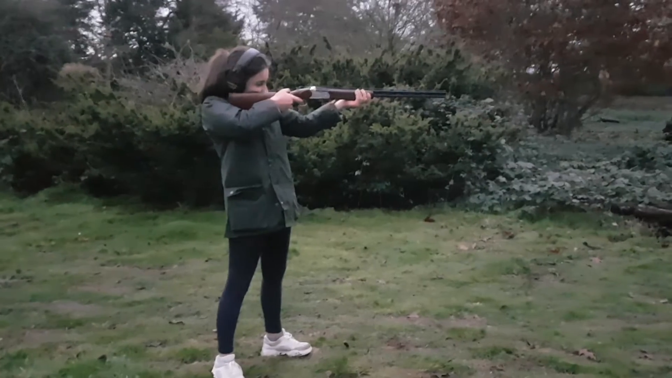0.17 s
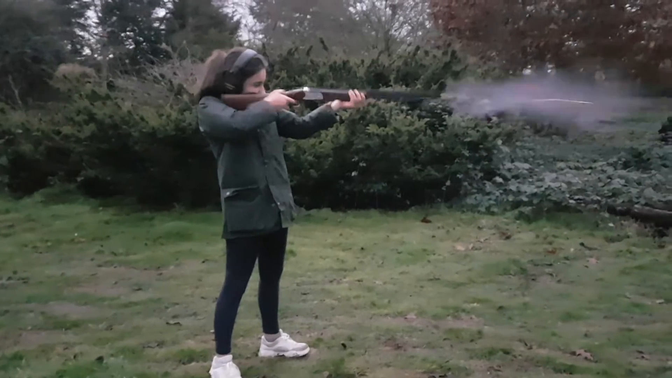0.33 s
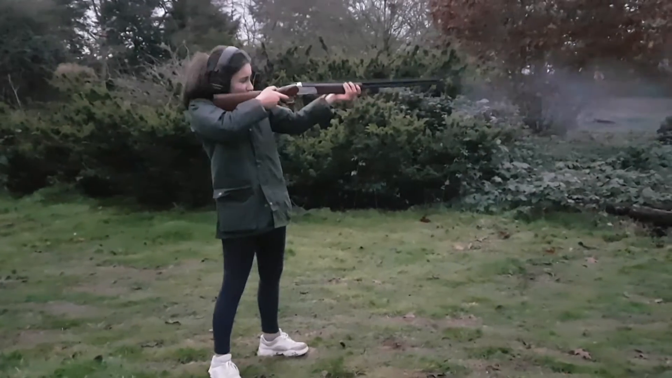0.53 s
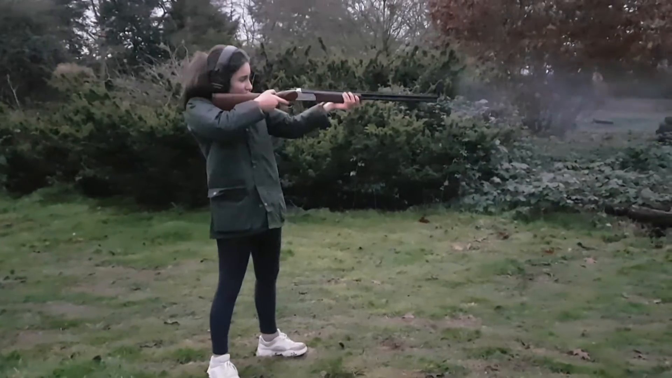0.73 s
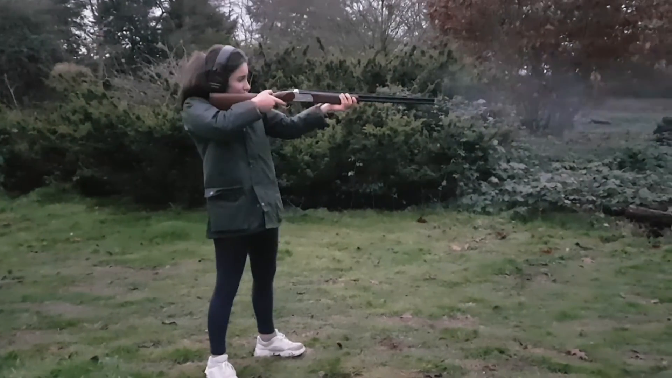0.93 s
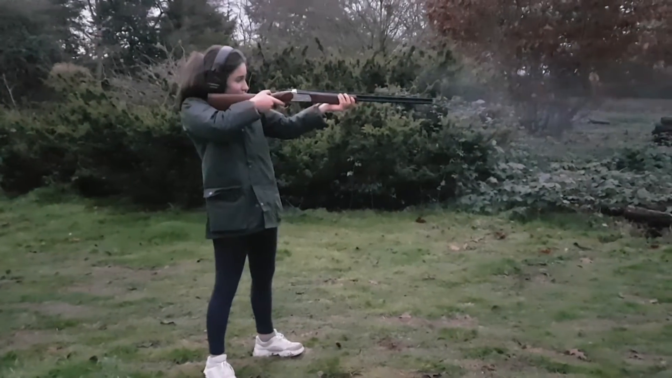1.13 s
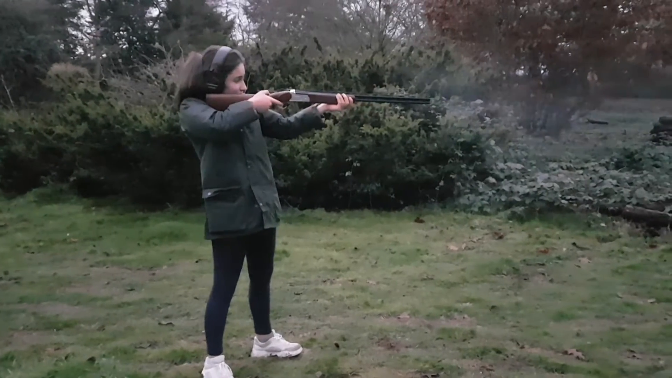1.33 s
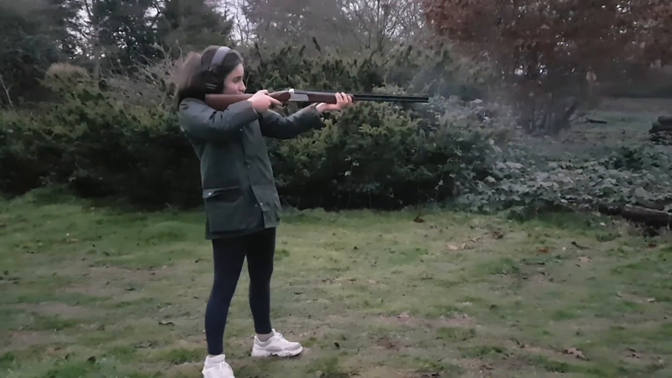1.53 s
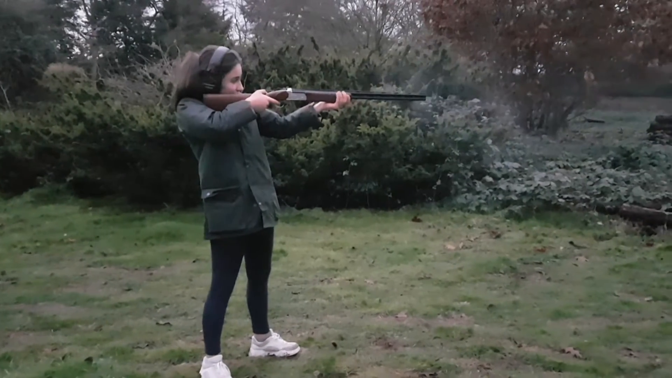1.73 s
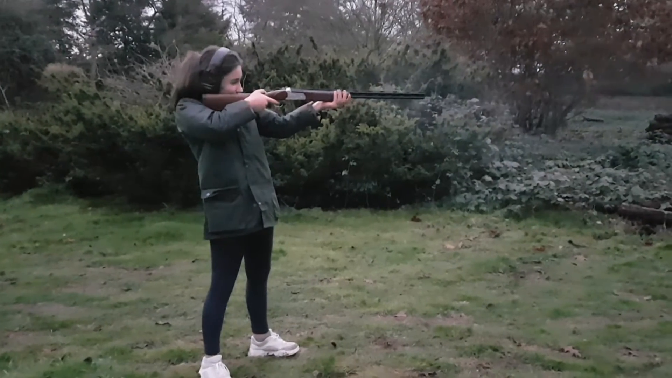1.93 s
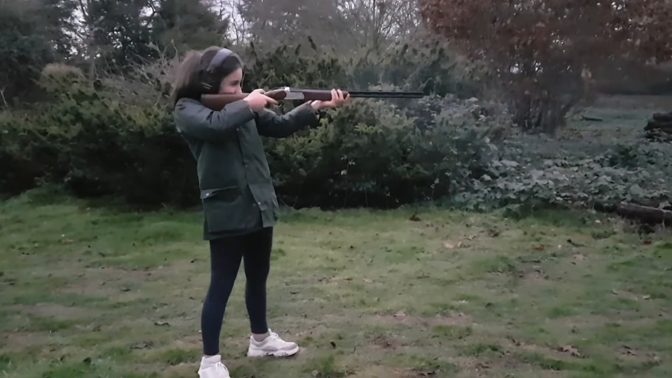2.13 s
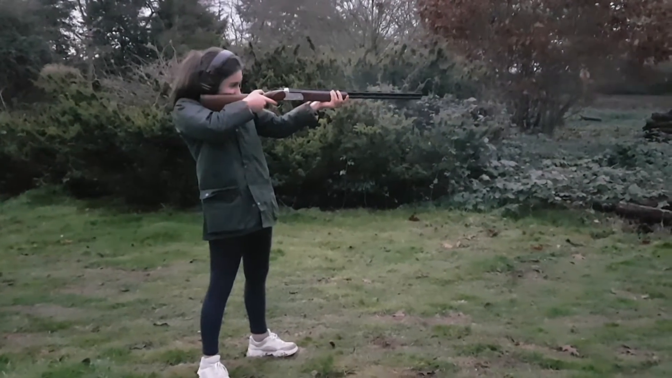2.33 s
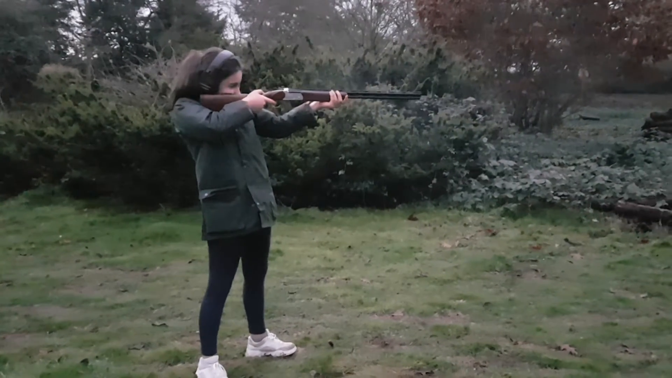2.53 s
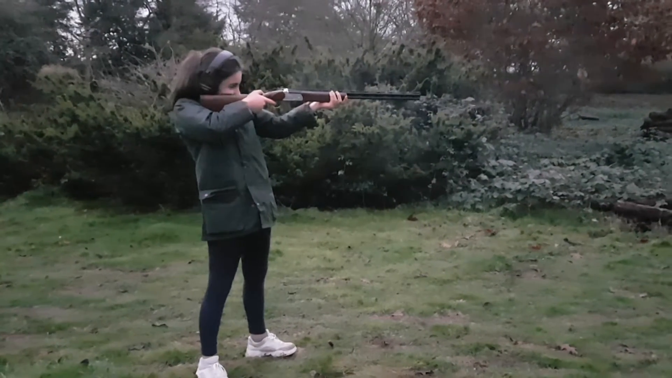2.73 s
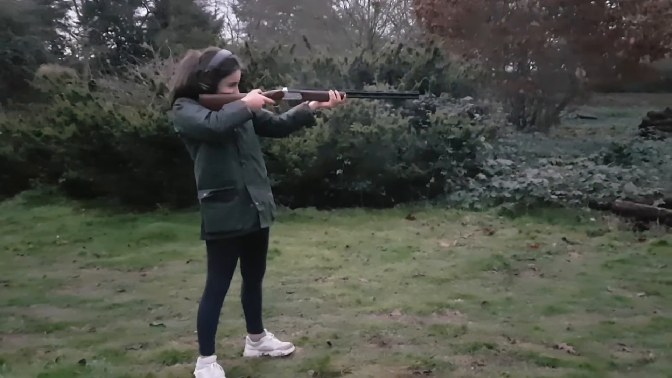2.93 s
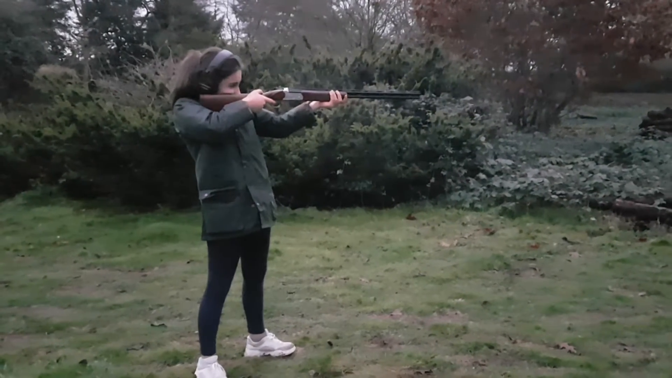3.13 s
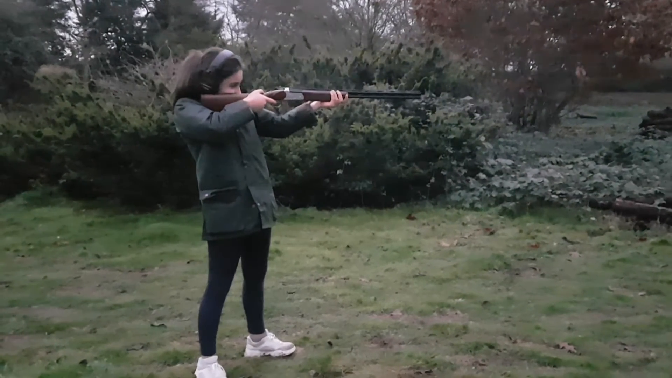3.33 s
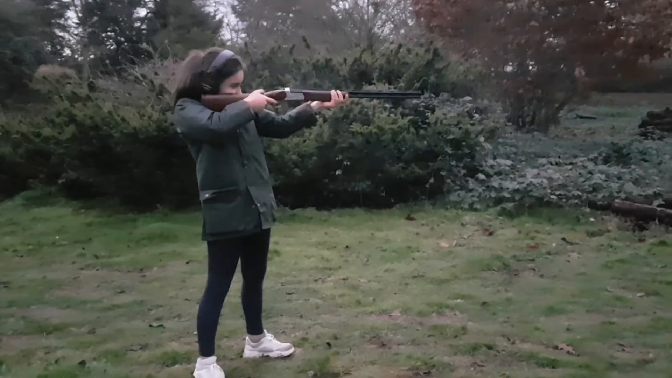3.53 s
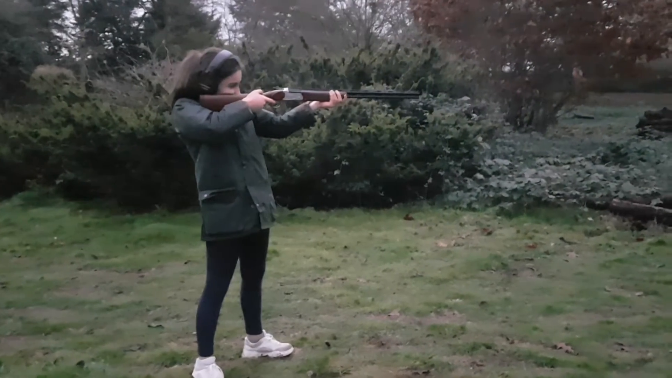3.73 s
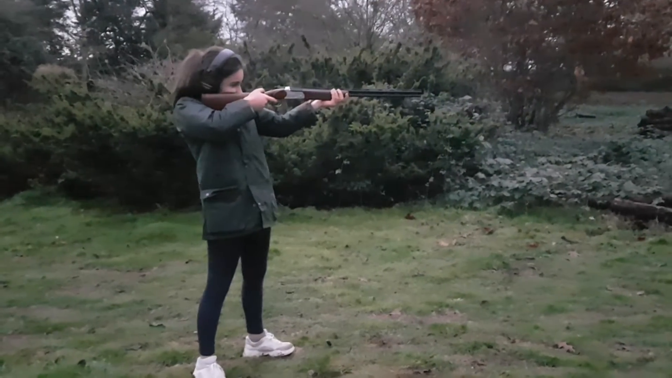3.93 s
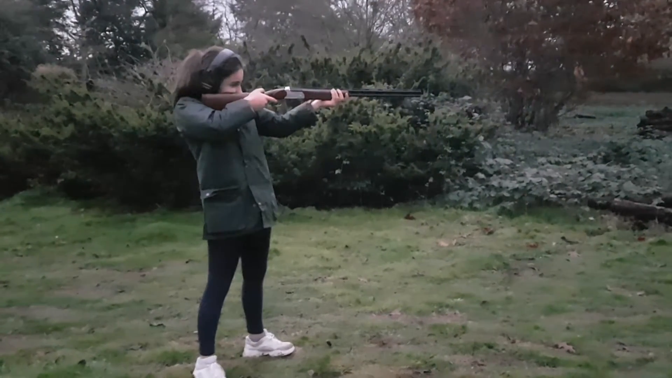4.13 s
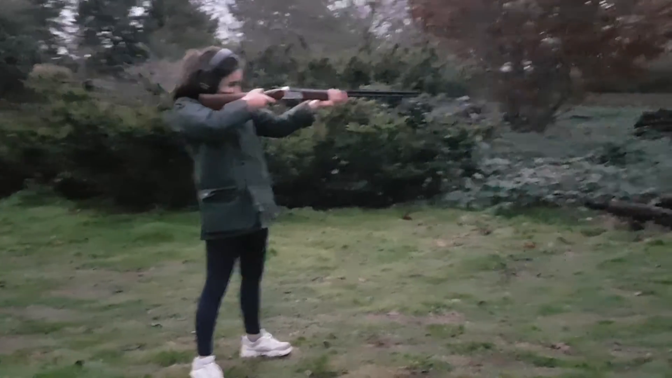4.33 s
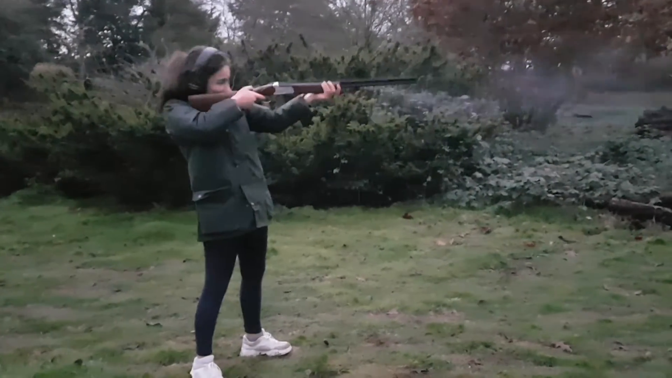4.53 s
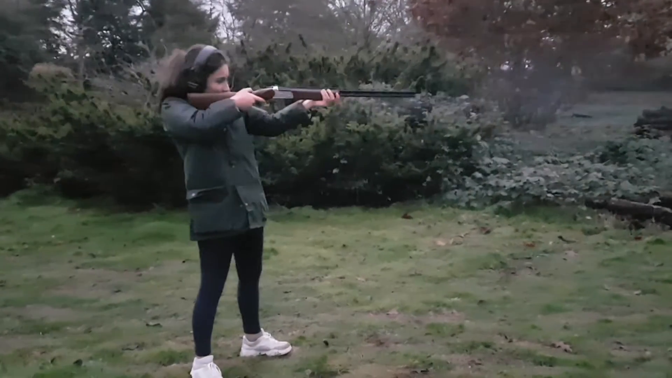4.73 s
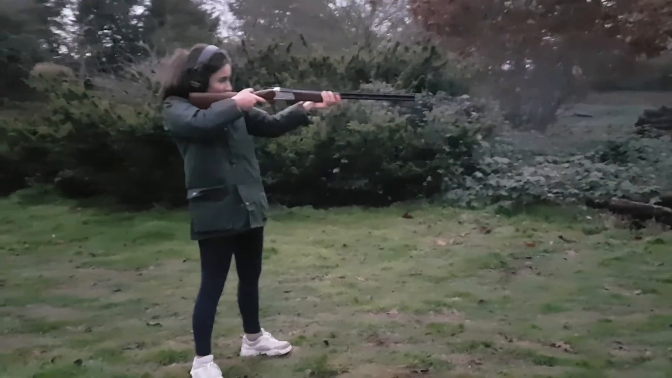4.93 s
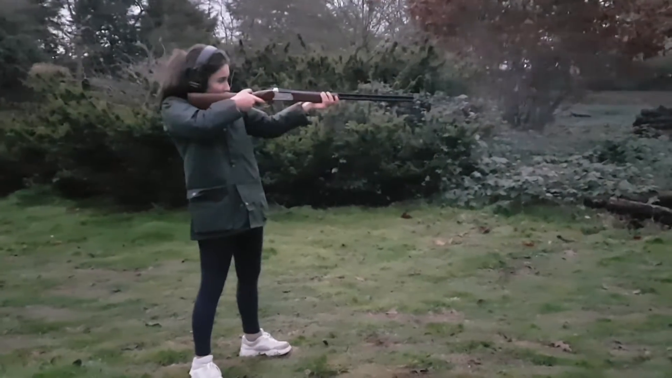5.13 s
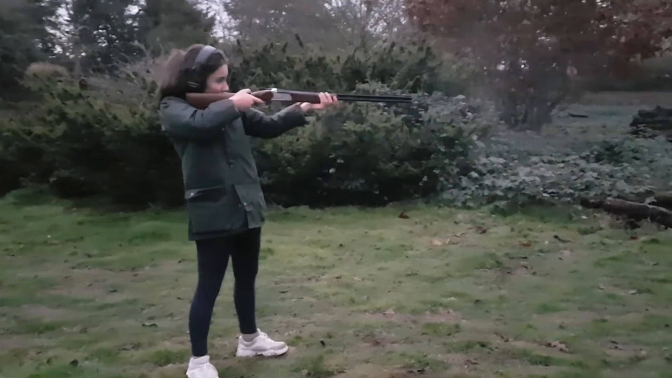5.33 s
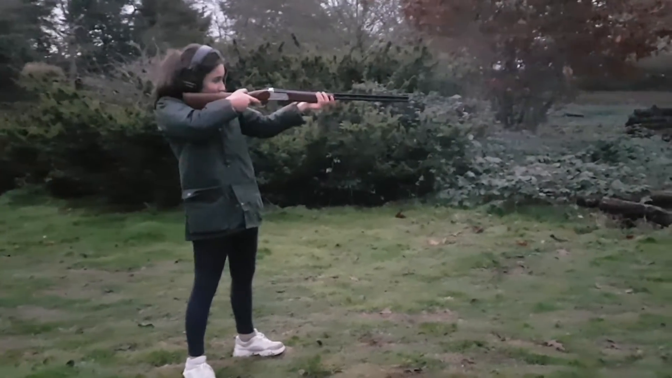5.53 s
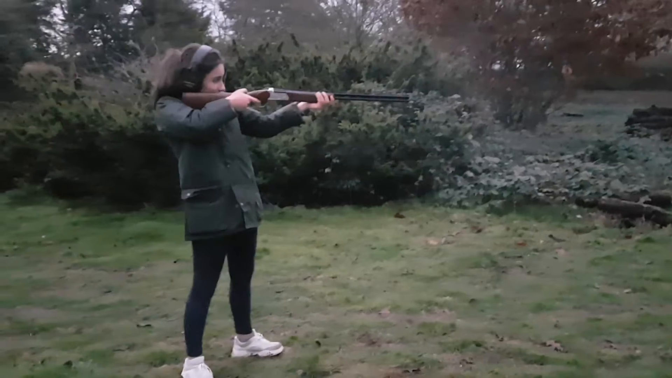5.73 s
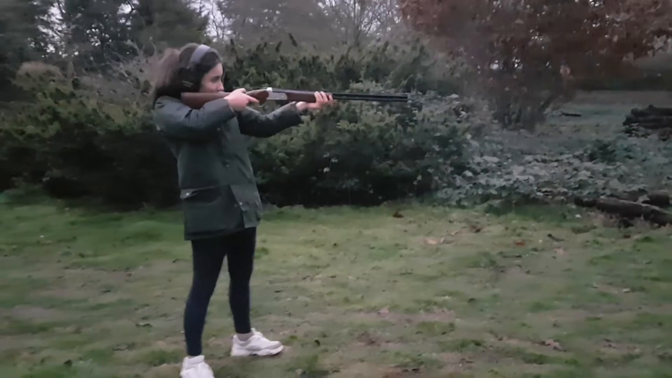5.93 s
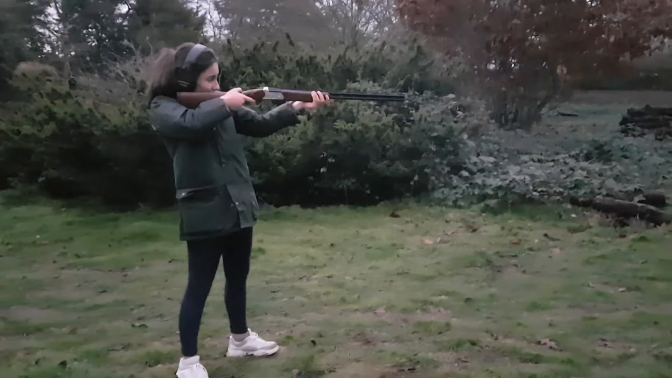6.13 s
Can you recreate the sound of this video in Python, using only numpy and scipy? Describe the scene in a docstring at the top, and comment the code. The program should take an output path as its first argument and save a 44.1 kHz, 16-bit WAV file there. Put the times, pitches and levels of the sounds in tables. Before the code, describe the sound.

Two loud shotgun blasts about four seconds apart outdoors, each cracking hard and scattering into slapping leafy echoes over low distant traffic drone.

```python
"""A shotgun fires twice on a lawn, a few metres from two microphone ports: a push and a suction, then echoes.
Hedges, trees and walls return both reports as a leafy wash of shaped noise and a row of single slaps.
Far traffic, noise with a slowly swelling spectrum, drones from the right; a falling band of noise is a bird.
Cloth rustles in uneven grains and small ticks snap; the level sinks for a while around the shots."""
import sys
import numpy as np
from scipy import signal
from scipy.io import wavfile
from scipy.ndimage import uniform_filter1d

SR = 44100
rng = np.random.default_rng(int(sys.argv[2]) if len(sys.argv) > 2 else 0)


def store_pcm(level_fs):
    """Save levels as 16-bit WAV."""
    pcm = np.round(np.clip(level_fs, -1, 1) * 32767).astype(np.int16)
    wavfile.write(sys.argv[1], SR, np.atleast_2d(pcm).T)


N = 272538  # length in samples

# The shots and the sinking of the level around them. Each row: start in seconds, level in dB, corner below
# which the bass fades in Hz, hold on the front in dB, sinking at first in dB, sinking at last in dB,
# time from first to last in seconds.
SHOTS = [(0.5154, 0.5, 54.9, 0, -5, -7.5, .75), (4.5443, 2, 136, -22, -4.5, 0.5, 0.18)]
# Slaps from walls and trunks. Each row: delay in seconds, level in dB, pitch in Hz, left minus right in dB,
# smear in seconds.
WALL_ECHOES = [(0.0249, -8, 357.5, -2, 0.013), (0.044, -13.5, 1530, -2, .012),
               (.061, -15, 296.4, -1, 0.014), (0.0685, -1.5, 1830, -5.5, .014),
               (0.1068, -9.5, 617, 4.5, 0.024), (0.1102, -9, 319, -6, 0.0064), (.116, -19, 770, 9, 0.0071),
               (0.121, -14, 382, -5, 0.011), (0.133, -16, 1840, -4, 0.016), (.148, -20, 760, -1, 0.012),
               (0.186, -9.5, 1600, 1.5, 0.023), (0.1903, -11, 810, 1.5, 0.013),
               (0.1974, -18, 220, 0, 0.0086), (0.2355, -21.5, 600, 3, 0.016),
               (0.2605, -17.5, 1040, -5, 0.013), (0.299, -17, 840, -0.5, 0.024),
               (0.3036, -28.5, 170, -2, 0.005), (0.359, -22.5, 920, -13, 0.0044),
               (0.3859, -18, 800, -5, 0.013), (.3918, -18.5, 1737, -7.5, .006),
               (0.418, -28, 810, -2, 0.027), (0.435, -20.5, 800, -2, 0.011), (0.4566, -26, 760, 1, 0.0099),
               (0.76, -36.5, 710, -3, 0.021), (.797, -37, 780, -3, 0.015), (0.8465, -31, 870, 3, 0.0036),
               (.91, -44, 600, 0, .008)]
# Sound scattered by leaves and ground. Each row: delay in seconds, level in dB, extra level of the treble in dB.
LEAF_SCATTER = [(0, 1.5, 1), (.02, -5.5, -0.5), (.07, -13.5, 4), (.2, -20, -3), (.26, -25.5, 11),
                (.33, -27, 5.5), (.46, -32, 8.5), (.6, -45.5, 18.5), (.8, -44, 11), (1, -51.5, 0),
                (1.3, -45.5, 0)]
# Share of that extra treble by frequency. Each row: frequency in Hz, share as a factor.
TREBLE_SHARE = [(2500, 0.13), (9000, 1)]
# Spectrum of the report as it arrives. Each row: frequency in Hz, relative density in dB per Hz.
REPORT_SPECTRUM = [(30, -20), (150, -15.5), (310, -10.5), (680, -5), (1220, -11), (1860, -5), (2150, -6.5),
                   (2750, -7.5), (3300, -11.5), (4600, -13.5), (5600, -23), (7100, -17.5), (8740, -27),
                   (16000, -22)]
# Loss with distance. Each row: frequency in Hz, time to fall by 60 dB in seconds.
AIR_T60 = [(40, .5), (150, 1.5), (300, 0.83), (600, 3.6), (1500, 10), (3000, 1.8), (6000, 1.2),
           (9500, 0.54), (15000, 0.73)]
# The traffic sinks deeper in the treble. Each row: frequency in Hz, factor on the sinking in dB.
DIP_DEPTH = [(200, 0.91), (1500, .9), (4000, 1.2), (10000, 2.2)]
# Tyre roar near 900 Hz over microphone hiss. Each row: frequency in Hz, relative density in dB per Hz.
TRAFFIC_SPECTRUM = [(21, -41), (40, -10.5), (60, -1.5), (130, -5.5), (284, -10.5), (390, -9), (550, -11),
                    (920, 0.5), (1250, -9), (1800, -7), (2150, -15), (2750, -21), (3300, -29.5),
                    (4300, -33), (9000, -43.5), (15700, -37.5)]
# Vehicles passing. Each row: time in seconds, tyre roar in dB, engine rumble in dB, both before the shares.
PASSING = [(0, -1, 8.5), (.45, -0.5, 8.5), (1.3, -2.5, 2.5), (1.7, -1, -3.5), (2.1, 1, -0.5),
           (2.5, 1.5, -2.5), (3, 1.66, -2), (3.5, 1.5, -4), (4.1, 2, -3), (4.5, 2, -5), (5.3, 3, -14.5),
           (5.7, -0.5, -8), (6.2, -1, -6.5)]
# How far a band follows the vehicles. Each row: frequency in Hz, share of the roar, share of the rumble.
PASSING_SHARES = [(147.7, 0, 0.98), (450, 0.98, 0), (2516, 0.74, 0.13), (5000, 0.055, 0.13)]
# Likeness of the two ports before the width factor. Each row: frequency in Hz, likeness from 0 to 1.
PORT_LIKENESS = [(60, 0.84), (300, 0.51), (800, 1), (1500, 0.22), (3000, 0.13), (6000, .2), (15000, 0.065)]
# Balance of the ports. Each row: frequency in Hz, left minus right in dB.
PORT_BALANCE = [(60, -2), (110, 0.5), (200, 0), (380, -3.5), (700, -4), (1290, -6.0), (2380, -9),
                (4400, -4.5), (8120, 0.5), (15000, 0)]
# Movements of jacket cloth. Each row: start in seconds, time until it lets go in seconds, level in dB.
RUSTLES = [(0.0, 0.47, -69), (5.23, 0.17, -57), (5.5, .12, -68.5)]
# Spectrum of the cloth. Each row: frequency in Hz, relative density in dB per Hz.
CLOTH_SPECTRUM = [(1500, -39), (2600, -11), (3500, 1.5), (4200, 2), (5700, -4.5), (6500, -16),
                  (8000, -10.5), (10100, -25), (16000, -21)]
# Small dry ticks. Each row: start in seconds, level before panning in dB, pitch in Hz.
TICKS = [(0.031, -49.5, 3180), (.33, -68, 5200), (2.065, -38, 890), (5.387, -44, 1510), (5.425, -50, 3420),
         (5.518, -53, 3600), (5.533, -66, 4500), (5.565, -59, 4500), (5.584, -58, 4300), (5.611, -58, 3500),
         (5.693, -45, 1850), (5.845, -65, 5000), (5.918, -62, 5000)]
# The bird's call. Each row: time in seconds, level before panning in dB, pitch in Hz.
BIRD_CALL = [(3.19, -76, 7640), (3.24, -75, 7000), (3.3, -74.5, 6850), (3.36, -74, 6800), (3.42, -78, 6080)]

TRAFFIC_DB = -52  # level of the mean of both ports
LAG_S = 0.00031  # sound from the right reaches the left port later
EDGE_HZ = 15950  # upper band limit
OFFSET = -.0005  # steady voltage of the converter, ahead of the sinking
# the held front lets go; the sinking waits, falls, and returns
FRONT_S, SINK_WAIT_S, SINK_S, RETURN_S = 0.014, .014, 0.027, 0.24
# a cloth movement swells from a quiet edge, holds, and fades
RUSTLE_RISE_S, RUSTLE_FALL_S, RUSTLE_EDGE_DB = 0.048, 0.12, -18


def gain_of(db):
    """Logarithmic level: twenty decibels are a factor of ten in amplitude."""
    return 10 ** (np.asarray(db) / 20)


def evened(x):
    """Normalisation: a signal divided by its root mean square has unit power."""
    return x / np.sqrt(np.mean(x ** 2) + 1e-20)


def read(points, hz, axis=1):
    """Interpolation on a logarithmic frequency scale of one column of a spectrum."""
    table = np.transpose(points)
    return np.interp(np.log(hz + 1), np.log(table[0] + 1), table[axis])


def along(rows, t, axis=1):
    """Linear interpolation in time of one column of a curve."""
    table = np.transpose(rows)
    return np.interp(t, table[0], table[axis])


def add(mix, s, sound):
    """Superposition: a two-channel sound sums into the mix from a given second."""
    part = mix[:, round(s * SR):][:, :sound.shape[1]]
    part += sound[:, :part.shape[1]]


def smoothed_patches(s, hz, bins, frames):
    """Random field: noise averaged over neighbouring pitches and times drifts in patches of unit power."""
    field = rng.standard_normal((len(s), len(hz))).T
    field = uniform_filter1d(field, size=bins, axis=0)
    return evened(uniform_filter1d(field, size=frames, axis=1))


def at_ports(right, other, field_db, size, wide=0.94):
    """Coherence of spaced ports: the left hears the right's sound late, mixed with independent noise."""
    overlap = size - size // 4
    hz, t, z = signal.stft([right, other], SR, nperseg=size, noverlap=overlap)
    same = np.clip(wide * read(PORT_LIKENESS, hz), 0, 1)[:, None]
    late = np.exp(-2j * np.pi * hz * LAG_S)[:, None]
    left = same * late * z[0] + np.sqrt(1 - same ** 2) * z[1]
    left = left * gain_of(read(PORT_BALANCE, hz))[:, None]
    pair = np.array([left, z[0]]) * gain_of(field_db(hz[:, None], t))
    return signal.istft(pair, SR, nperseg=size, noverlap=overlap)[1][:, :len(right)]


def dip_db(t):
    """Gain envelope: the level sinks after each shot and returns; the front may be held down for a moment."""
    total = 0 * t
    for s, _, _, front_db, first_db, last_db, stay_s in SHOTS:
        turns = s + SINK_WAIT_S + np.cumsum([0, SINK_S, stay_s, RETURN_S])
        sinking = np.interp(t, turns, [0, first_db, last_db, 0])
        since = np.maximum(t - s, 0)
        total += sinking + (t >= s) * front_db * np.exp(-since / FRONT_S)
    return total


def traffic():
    """Broadband noise sources: roar and rumble swell as vehicles pass, with drifting patches."""
    def field_db(hz, t):
        patches = smoothed_patches(t, hz, bins=12, frames=8)
        roar = read(PASSING_SHARES, hz) * along(PASSING, t)
        rumble = read(PASSING_SHARES, hz, axis=2) * along(PASSING, t, axis=2)
        # only the departure from the overall sinking, which acts on the whole mix later
        extra_dip = (read(DIP_DEPTH, hz) - 1) * dip_db(t)
        return read(TRAFFIC_SPECTRUM, hz) + roar + rumble + extra_dip + 0.68 * patches
    pair = at_ports(*rng.standard_normal((2, N)), field_db, size=1024)
    between_shots = pair[:, 2 * SR:4 * SR].mean(0)
    return gain_of(TRAFFIC_DB) * pair / np.std(between_shots)


def bird(width_hz=300):
    """Modulation of a falling carrier: low-passed noise gives the band of a far call blurred by the trees."""
    t = np.arange(BIRD_CALL[0][0], BIRD_CALL[-1][0], 1 / SR)
    low_pass = signal.butter(2, width_hz, fs=SR, output="sos")
    blur = signal.sosfilt(low_pass, rng.standard_normal((2, 2, len(t))))
    carrier = np.exp(2j * np.pi * np.cumsum(along(BIRD_CALL, t, axis=2)) / SR)
    call = evened(((blur[0] + 1j * blur[1]) * carrier).real)
    level_db = along(BIRD_CALL, t) + [[-1.5], [4]]  # stronger at the right
    return call * gain_of(level_db) * signal.windows.tukey(len(t), .4)


def rustle(length, db):
    """Stick-slip friction: cloth fibres slip in tiny uneven crackles."""
    turns = np.array([0, RUSTLE_RISE_S, length, length + RUSTLE_FALL_S])
    t = np.arange(0, turns[-1], 1 / SR)
    crackle_db = 2.0 * np.minimum(rng.exponential(1, len(t)), 5)
    grains = rng.standard_normal((2, len(t))) * gain_of(crackle_db)
    pair = at_ports(*grains, lambda hz, s: read(CLOTH_SPECTRUM, hz) + 0 * s, size=256)
    shape_db = RUSTLE_EDGE_DB * np.interp(t, turns, [1, 0, 0, 1])
    return evened(pair) * gain_of(db + shape_db) * signal.windows.tukey(len(t), .1)


def tick(db, hz, t60=0.016):
    """Damped impulse: band-passed noise around one pitch decays by 60 dB in t60 seconds."""
    t = np.arange(900) / SR
    band = signal.butter(2, [hz / 1.4, hz * 1.4], "band", fs=SR, output="sos")
    noise = evened(signal.sosfilt(band, rng.standard_normal((2, 900))))
    return gain_of([[db - 3], [db + 2]]) * noise * gain_of(-60 * t / t60)


def slap(db, hz, pan_db, smear_s, turns=2.4, boom_db=-17, crack_db=-7, smear_db=-5):
    """Reflection: a push and a pull over a low boom return, and rough surfaces smear copies around them."""
    u = np.arange(0, turns, hz / SR)  # in cycles of the pitch
    v = np.arange(0, 1, 170 / SR)  # in one cycle of the 170 Hz boom
    wave = gain_of(boom_db) * np.sin(2 * np.pi * v) * np.sin(np.pi * v)
    crack = gain_of(crack_db) * np.sin(2 * np.pi * 2.7 * u) * np.exp(-1.5 * u)  # steep leading edge
    front = (np.sin(2 * np.pi * u) + crack) * np.sin(np.pi * u / turns)
    wave[:len(u)] += front[:len(v)]
    spread = np.exp(-(np.arange(-500, 500) / (SR * smear_s / 2)) ** 2)
    copies = rng.standard_normal((2, 1000)) * spread
    # wider faces return more
    copies *= gain_of(smear_db) * np.sqrt(smear_s / .006) / np.linalg.norm(copies[0])
    copies[[0, 1], [500 + round(LAG_S * SR), 500]] += 1  # the clear reflection, later at the left
    sides = gain_of([[db + pan_db / 2], [db - pan_db / 2]])
    return sides * signal.fftconvolve(copies, wave[None], axes=1)


def leafy_wash(t):
    """Diffuse scattering: countless leaves return the blast as uneven noise, coloured by loss with distance."""
    def field_db(hz, s):
        air_db = 60 * s / np.maximum(read(AIR_T60, hz), .1)
        clumps = smoothed_patches(s, hz, bins=8, frames=6)  # bushes answer unevenly in time and pitch
        clumps_db = 3.8 * clumps * np.clip(1.2 - hz / 7000, .2, 1)
        treble_db = read(TREBLE_SHARE, hz) * along(LEAF_SCATTER, s, axis=2)
        return read(REPORT_SPECTRUM, hz) - air_db + clumps_db + treble_db
    sizes = gain_of(2 * np.minimum(rng.exponential(1, (2, len(t))), 5))
    wash = at_ports(*(rng.standard_normal((2, len(t))) * sizes), field_db, size=256, wide=.9)
    return wash / np.std(wash[1, :1300]) * gain_of(along(LEAF_SCATTER, t))


def report(count=160):
    """Blast wave and its reflections: a sudden push, a longer suction, the leafy wash, trunks and slaps."""
    t = np.arange(round(1.3 * SR)) / SR
    out = leafy_wash(t)
    u = t / 0.0021  # the push turns to suction after 2.1 ms
    out += gain_of(-8) * (1 - u) * np.exp(-u)
    lead_s = 500 / SR + .001  # a slap's smear starts ahead of its peak
    for when, size, pitch, side in rng.random((count, 4)):  # scattered trunks
        s = .03 + .6 * when
        db = along(LEAF_SCATTER, s) + 2 - 12 * size
        trunk = slap(db, hz=450 * 5.5 ** pitch, pan_db=12 * side - 9.5, smear_s=0.0045)
        add(out, s - lead_s, trunk)
    for s, db, hz, pan_db, smear_s in WALL_ECHOES:
        add(out, s - lead_s, slap(db, hz, pan_db, smear_s))
    return out


def scene():
    """Linear superposition: all sources sum, and the same surroundings answer both shots."""
    mix, shot = traffic(), report()
    for s, db, low_hz, *_ in SHOTS:
        bass_fade = signal.butter(2, low_hz, "high", fs=SR, output="sos")
        add(mix, s, gain_of(db) * signal.sosfilt(bass_fade, shot))
    for s, length, db in RUSTLES:
        add(mix, s, rustle(length, db))
    for s, db, hz in TICKS:
        add(mix, s, tick(db, hz))
    add(mix, BIRD_CALL[0][0], bird())
    return mix


def record(dry):
    """Gain, saturation and band limit: the level sinks, peaks clip, and a low-pass filter ends the band."""
    sunk = (dry + OFFSET) * gain_of(dip_db(np.arange(N) / SR))
    clipped = np.clip(sunk, -.92, .92)
    edge = signal.firwin(255, EDGE_HZ, window=("kaiser", 7), fs=SR)
    return np.clip(signal.oaconvolve(clipped, edge[None], "same"), -1, 1)


dry = scene()
out = record(dry)
store_pcm(out)
```